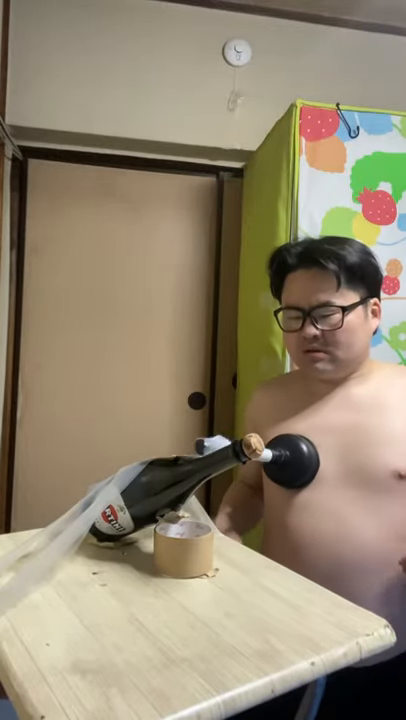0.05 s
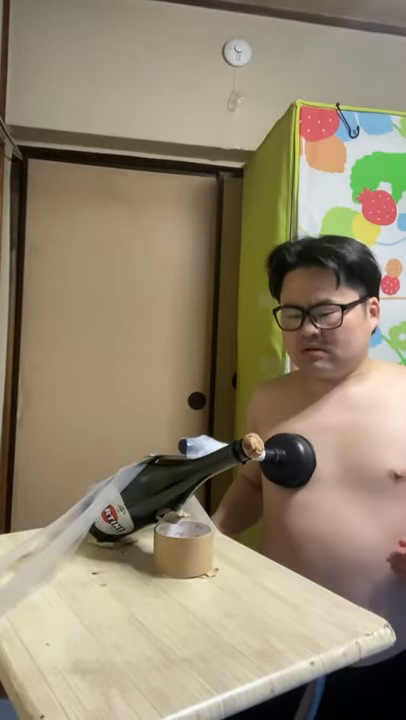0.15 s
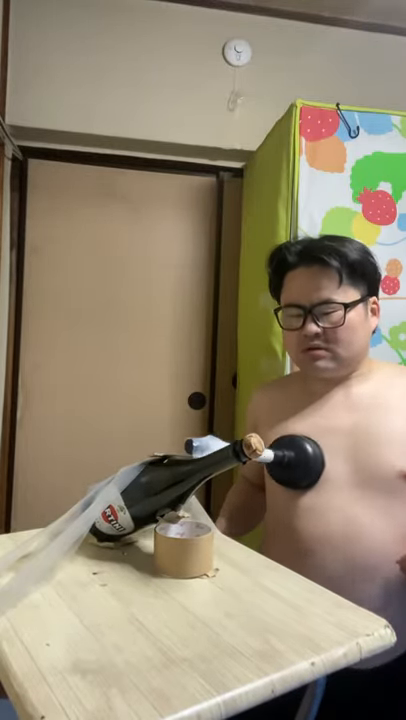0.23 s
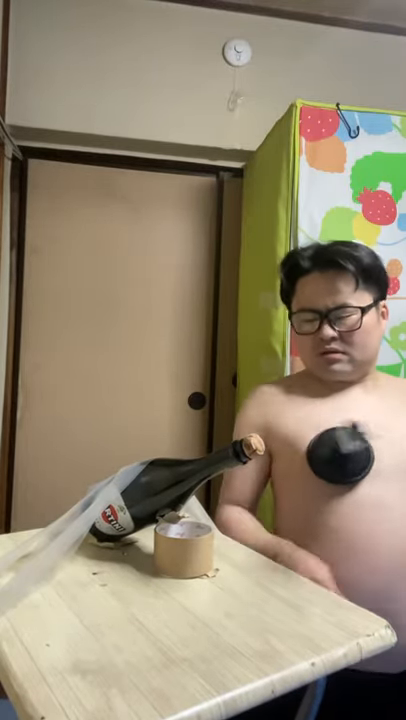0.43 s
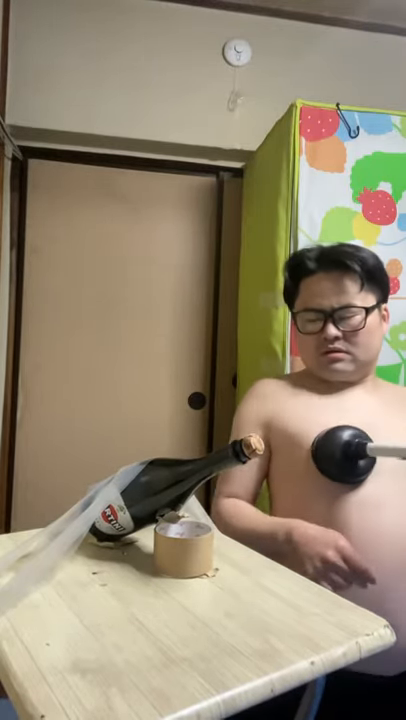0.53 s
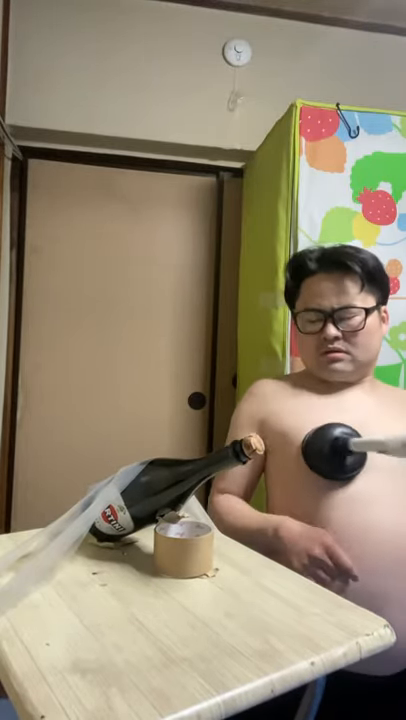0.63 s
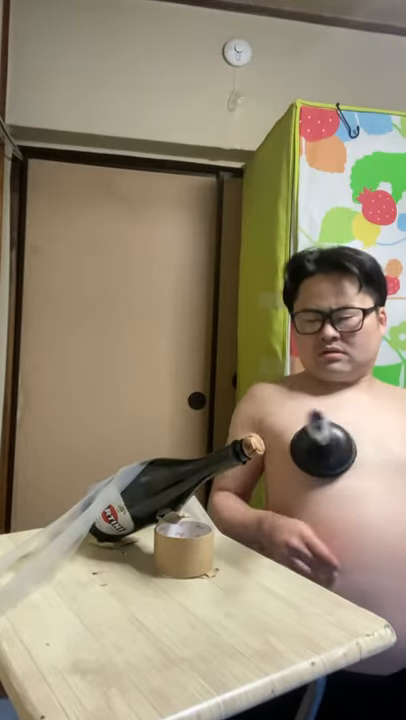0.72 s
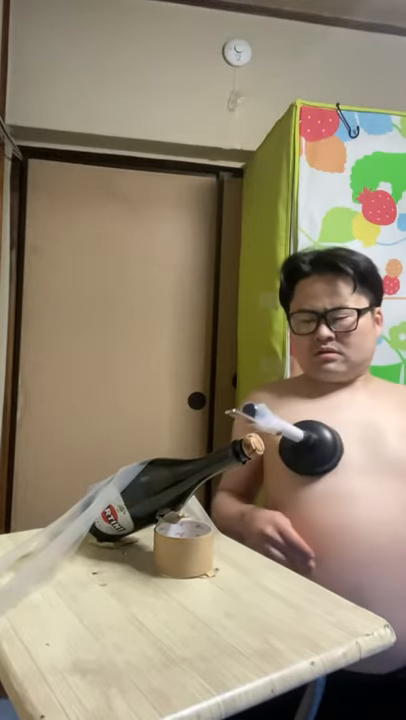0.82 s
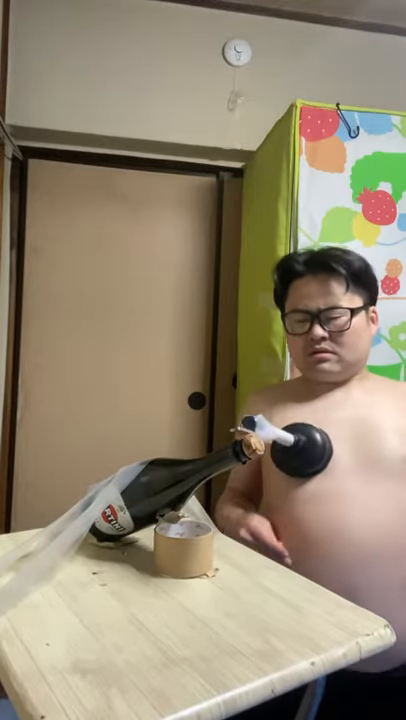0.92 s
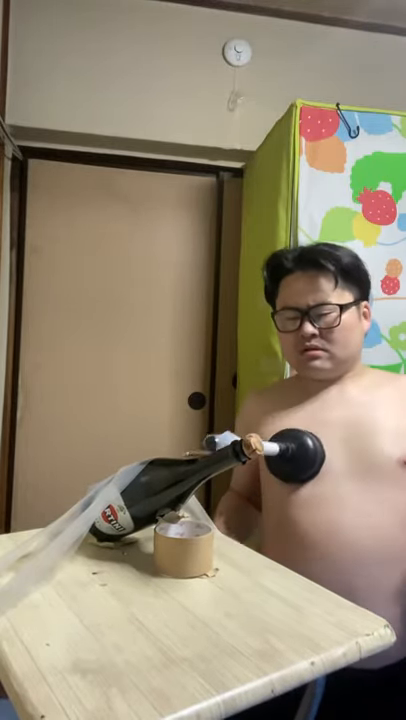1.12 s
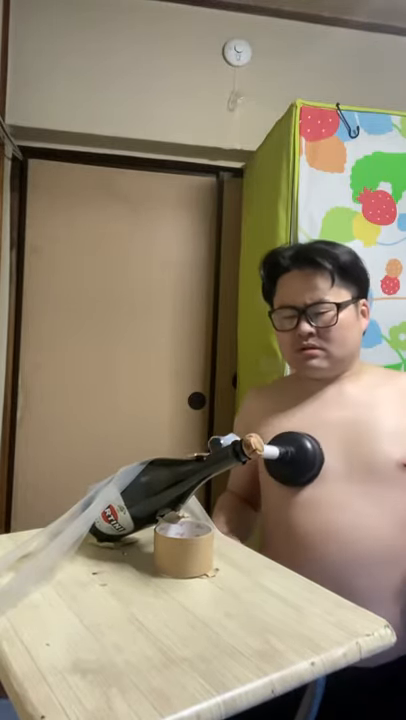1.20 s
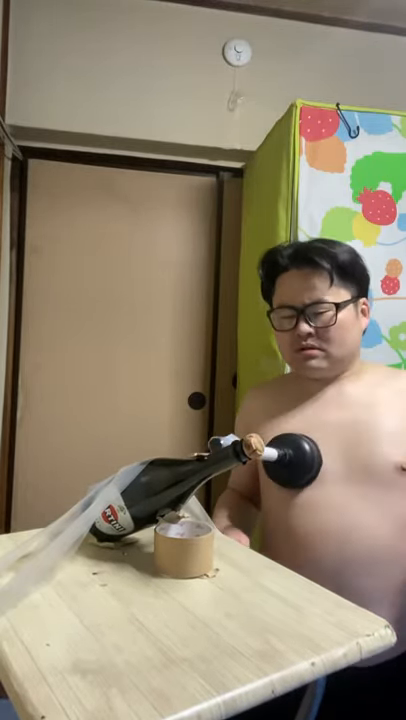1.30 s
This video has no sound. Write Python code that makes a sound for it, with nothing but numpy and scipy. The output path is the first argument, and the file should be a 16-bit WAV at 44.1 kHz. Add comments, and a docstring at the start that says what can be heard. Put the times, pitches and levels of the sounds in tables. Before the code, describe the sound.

A plunger handle knocks against a glass bottle on a table: a brief scrape and a sharp clink, a pause, then two more clinks and a faint scrape. Each rings briefly, sounding close in a small, quiet room.

```python
"""A small room: a plunger handle knocks and scrapes against the neck of a glass bottle propped on a table.
Each knock is a dry clack, a hollow tock of the handle and a short glassy ring whose partials depend on
the point of contact; hard ones thump the table. Scrapes are dense tiny slips that rasp and ring the glass.
A very thin, high whistle slides down as the handle swings clear. Quiet room tone lies underneath."""
import sys
import numpy as np
from scipy import signal
from scipy.fft import rfft, irfft
from scipy.io import wavfile

SR = 44100
rng = np.random.default_rng(int(sys.argv[2]) if len(sys.argv) > 2 else 0)


def bounce(signal):
    """Save signal as a 16-bit WAV file at the path given by the first command-line argument."""
    frames = np.transpose(np.atleast_2d(signal))
    limited = np.clip(frames, -1, 1)
    pcm = np.round(limited * 32767).astype(np.int16)
    wavfile.write(sys.argv[1], SR, pcm)


N = 59535
RING_S = .35

# Glass modes, six clusters. Each row of a cluster: frequency in Hz, level in dB, T60 in seconds.
GLASS_MODES = [
    [(2535, 2, .21), (2300, -24, .24), (2471, -13, .11), (1933, -22, .16)],
    [(2651, -2, .125), (2696, -1.5, 0.083), (2785, -12, 0.078)],
    [(4621, 0, .14), (4654, -8, .11), (4089, -19, .14), (6572, -15, .1), (8435, -19, .15)],
    [(6168, 3, 0.081), (6228, -6.5, .09), (6330, -11.5, 0.08), (6350, -12.5, .11), (5365, -10, .11),
     (6694, -14.5, 0.034)],
    [(7130, -1.5, 0.1), (7017, -0.5, 0.1), (9570, -9, 0.073), (6160, -17, 0.13), (11034, -16.5, 0.044)],
    [(7302, 1.5, 0.089), (7247, -8, .12), (7646, -13, 0.037)],
]
# Table top modes. Each row: frequency in Hz, level in dB re the thump, T60 in seconds.
TABLE_MODES = [(387, -12.5, 0.11), (401, -4, 0.15), (527, -22.5, 0.39), (1064, -15, 0.22)]
# Spectra of contact, hollow handle and table thump. Each row: frequency in Hz, relative density in dB.
CLACK_SPECTRUM = [(100, -18.5), (400, -14), (800, -14.5), (1150, -8), (1600, -5.5), (2200, -3), (2700, 1),
                  (3400, -6.5), (4200, 0.5), (4900, -4.5), (5500, 4.5), (6500, 0.5), (7300, 1),
                  (8200, -0.5), (9200, 1), (10200, -8.5), (11100, -1.5), (12200, -11.5), (14000, 3.5),
                  (14700, -11), (15600, -10), (16500, -28)]
TOCK_SPECTRUM = [(300, -37.5), (1150, -22.5), (1480, 2.5), (1850, -3.5), (2200, -17.5), (4000, -38)]
THUMP_SPECTRUM = [(25, -45.5), (60, -22.5), (130, -3), (220, 0), (320, -4.5), (500, -11.5), (800, -13.5),
                  (1500, -25.5), (4000, -60.5)]
# Each row: start in seconds, clack level in dB, clack tilt in dB per octave, tock level in dB,
# thump level in dB, damping by the handle in dB per second, then six glass cluster levels in dB.
KNOCKS = [ (0.0020, -42, -4, -48.5, -49, 5.3, -54, -55, -43, -70, -66, -74),
          (0.0150, -39, -7.5, -67, -48, 3.1, -52.5, -84, -54, -91, -71, -54),
          (0.1199, -29, -0.5, -45, -65, 6.9, -44.5, -41.5, -32.5, -46, -59, -50.5),
          (0.1814, -40.5, 0, -56.5, -73.5, 40, -55, -44, -35, -50.5, -57.5, -51.5),
          (0.1993, -25, 1.8, -38.5, -74, 320, -64, -49, -38, -25, -26, -29),
          (0.227, -11.5, 1.9, -38, -54.5, 84, -44.5, -15.5, -54, -19, -14, -15.5),
          (0.231, -15.5, 0, -50, -38, 31, -22, -42, -28, -25, -12.5, -14),
          (0.855, -20.5, -0.5, -33.5, -61.5, 12.7, -37.5, -46.5, -50, -28, -38, -33),
          (1.0170, -13, 0.74, -30.5, -55.5, 68, -44, -23.5, -16.5, -24, -31, -15.5),
          (1.0510, -26, 0, -59.5, -54.5, 118, -47.5, -42, -26.5, -30.5, -49, -29.5),
          (1.0969, -39.5, -1.5, -62, -75, 180, -55, -46, -70, -74, -90, -41.5),
          (1.2014, -42, -4, -51, -81, 71, -61, -50, -57, -47.5, -70, -50),
          (1.3214, -41, -1.3, -50.5, -64, 96, -72, -63, -68, -45.5, -74, -50), ]


def knocks():
    """The handle strikes the glass and shakes the table: returns clacks, glass ring and table sound."""
    clacks, rings, table = np.zeros((3, N))
    t = np.arange(round(RING_S * SR)) / SR
    clusters = [ring(modes, t) for modes in GLASS_MODES]
    table_top = ring(TABLE_MODES, t)
    blow = struck(t, rise_s=.00061, t60_s=.022)
    chatter = amp(-11.5) * struck(t, rise_s=.00061, t60_s=.087)  # loose contact buzzes on
    clack_envelope = np.hypot(blow, chatter)
    tock_envelope = struck(t, rise_s=.0021, t60_s=.057)
    thump_envelope = struck(t, rise_s=.0019, t60_s=.11)
    table_sway = amp(-33.5) * struck(t, rise_s=.04, t60_s=.26) * np.sin(2 * np.pi * 61.1 * t)
    for start_s, clack_db, tilt_db, tock_db, thump_db, damping_db_per_s, *cluster_db in KNOCKS:
        bright, hollow, low = rng.standard_normal((3, len(t)))
        add(clacks, start_s, amp(clack_db) * clack_envelope * colour(bright, CLACK_SPECTRUM, tilt_db))
        add(clacks, start_s, amp(tock_db) * tock_envelope * colour(hollow, TOCK_SPECTRUM))
        glass = sum(amp(db) * tone for db, tone in zip(cluster_db, clusters))
        add(rings, start_s, amp(-damping_db_per_s * t) * glass)
        thump = thump_envelope * colour(low, THUMP_SPECTRUM) + table_top
        add(table, start_s, amp(thump_db) * thump + amp(clack_db) * table_sway)
    return clacks, rings, table


# Each row: start in seconds, length in seconds, reference level in dB, swell in dB.
# A scrape grows from two swells below its reference to one below.
SCRAPES = [(0.122, .046, -47, 1.5), (0.169, .04, -36, 3.5), (1.183, 0.049, -55.5, 3),
           (1.276, 0.19, -48.5, 5.5)]
# Each entry: level of one glass cluster in dB re the rasp.
SCRAPE_CLUSTER_DB = [-12, -0.5, -2, -8, -11, -2]


def scrapes(slips_per_s=2500, slip_spread_db=3, attack_s=.0043, release_s=.008):
    """Dense tiny slips of the handle rasp and keep the glass singing: returns rasp and glass ring."""
    t = np.arange(N) / SR
    force = np.zeros(N)
    for start_s, length_s, db, swell_db in SCRAPES:
        age_s = t - start_s
        progress = np.clip(age_s / length_s, 0, 1)
        attack = np.clip(age_s / attack_s, 0, 1)
        release = np.exp(-np.maximum(age_s - length_s, 0) / release_s)
        force += attack * amp(db + swell_db * (progress - 2)) * release
    impulses = (rng.random(N) < slips_per_s / SR) * rng.choice([-1, 1], N)
    slip_db = slip_spread_db * np.minimum(rng.exponential(1, N), 4)
    slips = unit(impulses * amp(slip_db))
    clusters = [ring(modes, t[t < RING_S]) for modes in GLASS_MODES]
    glass = sum(amp(db) * tone / np.linalg.norm(tone) for db, tone in zip(SCRAPE_CLUSTER_DB, clusters))
    rasp = force * colour(slips, CLACK_SPECTRUM, tilt_db=-2.26)
    return rasp, signal.fftconvolve(force * slips, glass)[:N]


# Hiss around a whistle. Each row: frequency in Hz, relative density in dB.
HISS_SPECTRUM = [(6000, -30), (11000, -13.5), (12500, 0), (15500, -1.5), (16300, -20)]
# Each row: start in seconds, length in seconds, start pitch in Hz, end pitch in Hz, level in dB.
WHISTLES = [(0.332, 0.0847, 14960, 13500, -74.5), (0.397, 0.0658, 13590, 11650, -66),
            (.43, 0.073, 15500, 11770, -75.5), (0.461, 0.058, 13130, 11730, -70.5),
            (0.466, 0.064, 15500, 11800, -78)]


def whistles(width_hz=200, hiss_db=-2):
    """Faint narrow bands of noise swell, slide down and fade in a little hiss."""
    out = np.zeros(N)
    pole = np.exp(-np.pi * width_hz / SR)
    for start_s, length_s, start_hz, end_hz, db in WHISTLES:
        noise = rng.standard_normal((3, round(RING_S * SR)))
        real, imag = signal.lfilter([1], [1, -2 * pole, pole * pole], noise[:2])
        progress = np.arange(0, 1, 1 / (length_s * SR))
        pitch_hz = start_hz + (end_hz - start_hz) * progress
        carrier = np.exp(2j * np.pi * np.cumsum(pitch_hz) / SR)
        tone = unit((carrier * (real + 1j * imag)[:len(progress)]).real)
        hiss = amp(hiss_db) * colour(noise[2], HISS_SPECTRUM)[:len(progress)]
        swell = np.sqrt(np.sin(np.pi * progress))
        add(out, start_s, amp(db) * swell * (tone + hiss))
    return out


# Room decay. Each row: frequency in Hz, T60 in seconds.
ROOM_T60_S = [(100, 0.069), (400, 0.2), (1500, .14), (4000, 0.1), (8000, .125), (15000, .11)]


def room(x, delay_s=.003):
    """Dense short reflections of a small room, the low mids lasting longest."""
    hz, t, spectra = signal.stft(rng.standard_normal(SR // 2), SR, nperseg=256)
    decay = np.exp(-np.log(1000) * t / read(ROOM_T60_S, hz)[:, None])
    tail = signal.istft(spectra * decay, SR, nperseg=256)[1]
    tail *= np.clip(np.arange(len(tail)) / SR / delay_s - 1, 0, 1)
    return signal.fftconvolve(x, tail / np.linalg.norm(tail))[:N]


# Room tone. Each row: frequency in Hz, relative density in dB.
ROOM_TONE_SPECTRUM = [(15, -42), (25, -15.5), (108, 0), (141, -9.5), (229, -11), (384, -19.5), (427, -17),
                      (936, -22), (2110, -28.5), (7920, -33), (16000, -43)]


def room_tone(level_db=-68.5):
    """Steady quiet noise, mostly bass."""
    return amp(level_db) * colour(rng.standard_normal(N), ROOM_TONE_SPECTRUM)


def ring(modes, t, rise_s=.0016):
    """Struck modes ring as decaying sines."""
    return np.sqrt(2) * sum(amp(db) * struck(t, rise_s, t60_s) * np.sin(2 * np.pi * hz * t)
                            for hz, db, t60_s in modes)


def struck(t, rise_s, t60_s):
    """Quick rise, exponential decay."""
    return (1 - np.exp(-t / rise_s)) * np.exp(-np.log(1000) * t / t60_s)


def colour(x, spectrum, tilt_db=0):
    """Applies a spectrum and a tilt per octave above 400 Hz; returns rms 1."""
    hz = np.fft.rfftfreq(len(x), 1 / SR)
    octaves = np.log2(np.maximum(hz, 400))
    return unit(irfft(rfft(x) * amp(read(spectrum, hz) + tilt_db * octaves), len(x)))


def read(points, hz):
    """Interpolates a table over log frequency."""
    points_hz, values = np.transpose(points)
    return np.interp(np.log(hz + 1), np.log(points_hz + 1), values)


def amp(db):
    """Decibels to gain."""
    return np.exp(np.asarray(db) * (np.log(10) / 20))


def unit(x):
    """Scales to rms 1."""
    return x / np.sqrt(np.mean(x ** 2) + 1e-20)


def add(mix, start_s, sound):
    """Mixes a sound in at a time."""
    part = mix[max(round(start_s * SR), 0):][:len(sound)]
    part += sound[:len(part)]


def scene(contact_send_db=-6, glass_send_db=-15):
    """Knocks, scrapes and whistles over room tone, in mono; contact noise and glass reverberate."""
    clacks, rings, table = knocks()
    rasp, singing = scrapes()
    contact, glass = clacks + rasp, rings + singing
    echoes = room(amp(contact_send_db) * contact + amp(glass_send_db) * glass)
    background = room_tone()
    return (contact + glass + table + echoes + whistles() + background)[None]


def record(dry, cutoff_hz=16300):
    """Steep low-pass on the top treble."""
    lowpass = signal.firwin(255, cutoff_hz, window=("kaiser", 9), fs=SR)
    return signal.oaconvolve(dry, lowpass[None], "same")


dry = scene()
out = record(dry)
bounce(out)
```